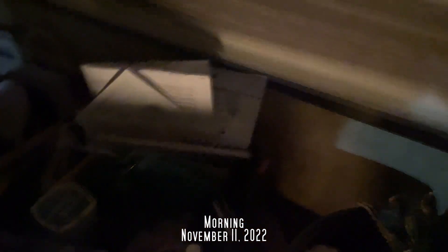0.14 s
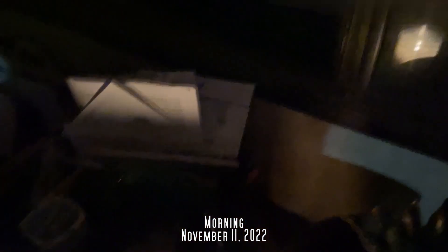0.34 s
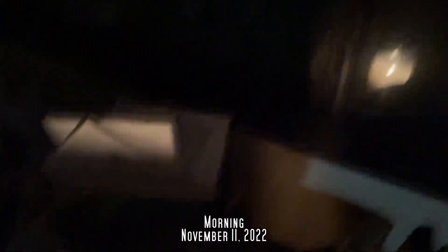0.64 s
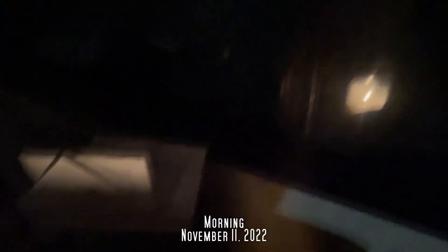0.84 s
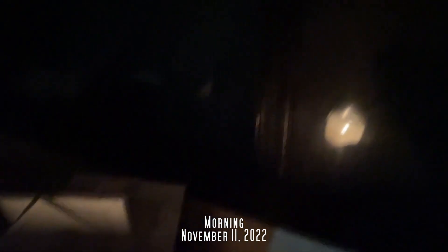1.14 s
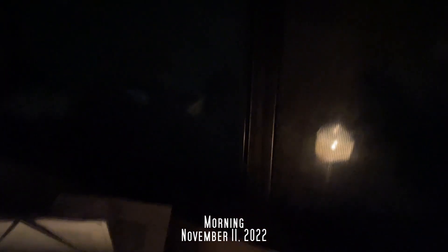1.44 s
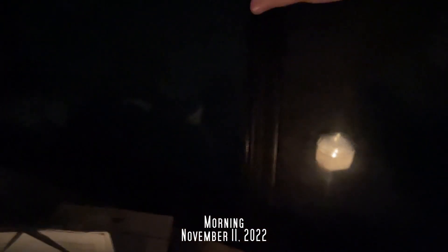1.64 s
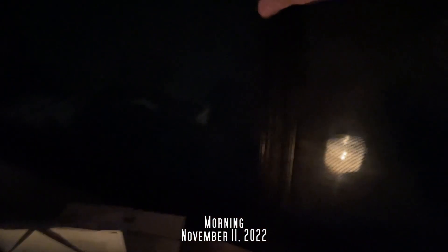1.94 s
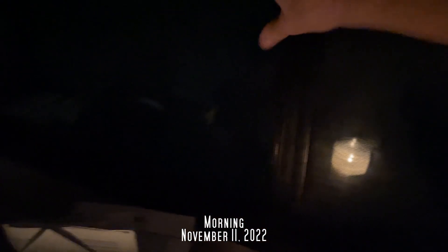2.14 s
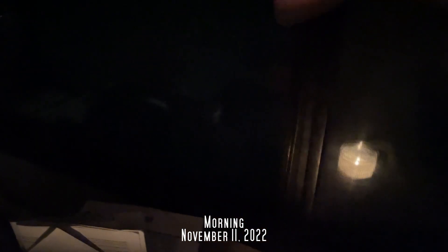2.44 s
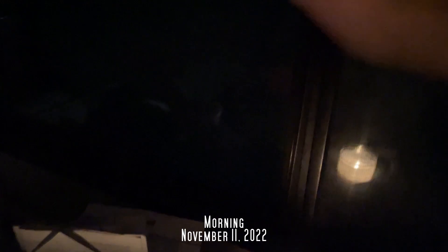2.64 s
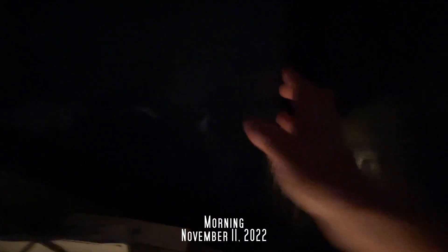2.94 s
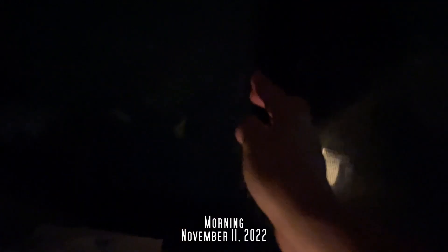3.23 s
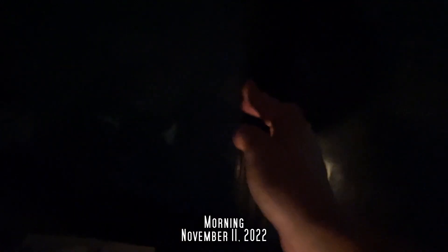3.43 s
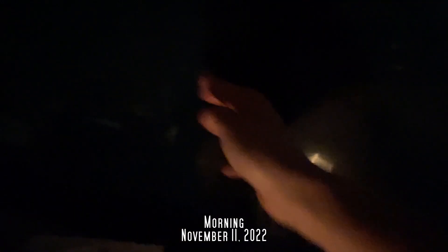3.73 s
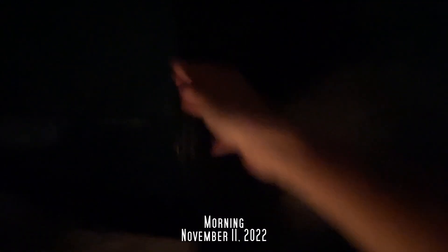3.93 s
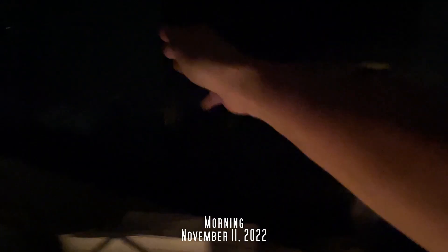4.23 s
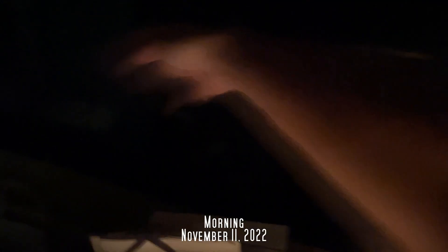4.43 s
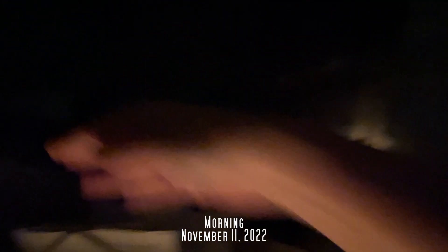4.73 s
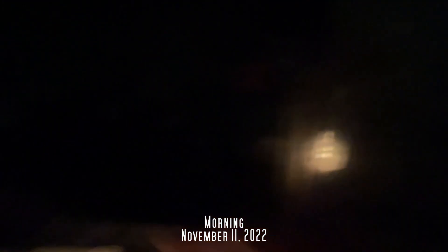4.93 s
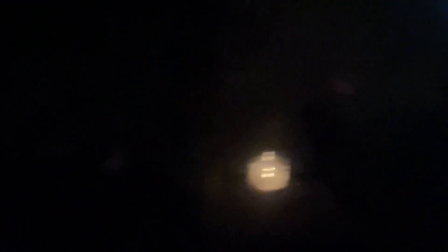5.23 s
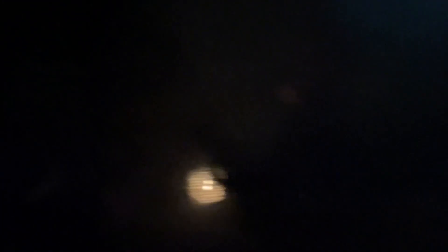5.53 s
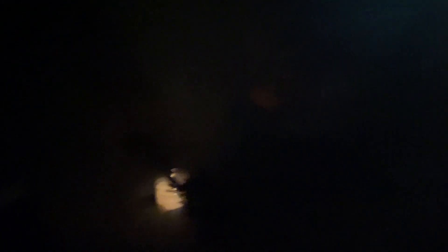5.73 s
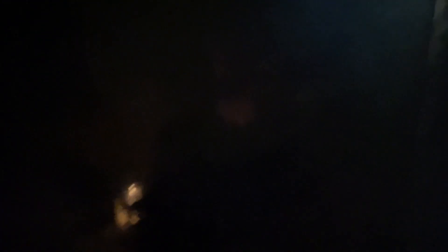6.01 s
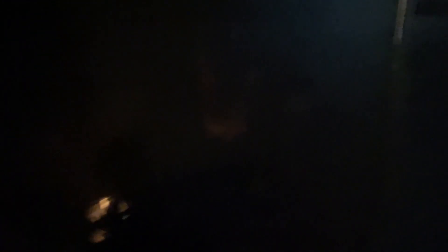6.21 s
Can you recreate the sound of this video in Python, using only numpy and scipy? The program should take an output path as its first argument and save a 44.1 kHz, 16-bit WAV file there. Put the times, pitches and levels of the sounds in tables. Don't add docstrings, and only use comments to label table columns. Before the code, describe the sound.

Close inside a small, quiet camper, a pleated blind slides with a soft hiss and a cord whirr that rises and falls. Light finger taps follow, then two sharp metallic latch snaps with a short ring. A screen brushes aside and stops with a hard, booming knock and small rattles. Finally a door swings out with ticks and faint creaks, over low floor thumps and faint hiss.

```python
import sys
import numpy as np
from scipy import signal
from scipy.fft import rfft, irfft, next_fast_len
from scipy.io import wavfile
from scipy.ndimage import uniform_filter1d, map_coordinates

SR = 44100
rng = np.random.default_rng(int(sys.argv[2]) if len(sys.argv) > 2 else 0)


def volts_from_decibels(level):
    exponent = np.asarray(level, float) / 20
    return 10 ** exponent


def bounce(signal):
    frames = np.transpose(np.atleast_2d(signal))
    limited = np.clip(frames, -1, 1)
    pcm = np.round(limited * 32767).astype(np.int16)
    wavfile.write(sys.argv[1], SR, pcm)


N = 280917


def rms_one(x):
    return x / np.sqrt(np.mean(x ** 2) + 1e-20)


def in_time(rows, silent=-130):
    s, *columns = np.transpose(rows)
    return [np.interp(np.arange(N) / SR, s, column, left=silent, right=silent) for column in columns]


def at_hz(points, hz):
    table_hz, values = np.array(points).T
    return np.interp(np.log(hz + 1), np.log(table_hz), values)


def coloured(spectrum, size):
    fast = next_fast_len(size, real=True)
    hz = np.arange(fast // 2 + 1) * SR / fast
    white = rfft(rng.standard_normal(fast))
    return rms_one(irfft(white * volts_from_decibels(at_hz(spectrum, hz)), fast)[:size])


def drift(rate_hz):
    coarse = np.arange(0, N + 32, 32)
    steps = coarse / SR * min(rate_hz, 60)
    slow = map_coordinates(rng.standard_normal(400), [steps], order=3)
    return np.interp(np.arange(N), coarse, slow)


def resonance(x, hz, width_hz):
    r = np.exp(-np.pi * width_hz / SR)
    return signal.lfilter([1 - r, 0, r - 1], [1, -2 * r * np.cos(2 * np.pi * hz / SR), r * r], x)


def narrow_resonance(x, hz, width_hz):
    return resonance(resonance(x, hz, width_hz), hz, 2 * width_hz)


def stereo(mid, side):
    return np.array([mid + side, mid - side])


def panned(pan_db):
    return volts_from_decibels(pan_db * np.array([[.5], [-.5]]))


def add(out, s, piece):
    i = int(s * SR)
    out[..., i:i + piece.shape[-1]] += piece[..., :N - i]


def swells(starts, held, levels_db, rise_db_per_s, fall_db_per_s):
    t = np.arange(0, N + 64, 64)[:, None] / SR
    before_db = rise_db_per_s * np.maximum(starts - t, 0)
    after_db = fall_db_per_s * np.maximum(t - starts - held, 0)
    power = (volts_from_decibels(levels_db - np.minimum(before_db + after_db, 200)) ** 2).sum(1)
    return np.interp(np.arange(N) / SR, t[:, 0], 10 * np.log10(power))


# frequency in Hz, density in dB per Hz.
RAIL_SPECTRUM = [(110, -25), (180, -7), (361, -5), (410, 2.5), (539, -4), (624, -6.5), (684, -2),
                 (1600, -12.5), (2080, -36), (3520, -120)]


def slide(hiss_db, rail_db, hiss, hiss_side, side_db, grain_db):
    flutter = volts_from_decibels(grain_db * drift(45))
    bright = stereo(coloured(hiss, N), volts_from_decibels(side_db) * coloured(hiss_side, N))
    dull = stereo(coloured(RAIL_SPECTRUM, N), volts_from_decibels(-4.0) * coloured(RAIL_SPECTRUM, N))
    return flutter * volts_from_decibels(hiss_db) * bright + volts_from_decibels(rail_db + 2 * drift(30)) * dull


def stroke(rows, rail_db, follows):
    hiss_db, = in_time(rows)
    rumble_db = rail_db + follows * (hiss_db + 50)
    return hiss_db, np.minimum(rumble_db, hiss_db + 14)


# time in seconds, hiss level in dB.
BLIND_PULL = [(0.0, -68), (0.06, -66), (0.114, -60), (0.18, -53), (0.4, -48.5), (0.494, -52.5),
              (0.6, -49.5), (0.745, -56.5), (0.8, -74), (.95, -96)]
# frequency in Hz, density in dB per Hz.
FABRIC_SPECTRUM = [(590, -30), (1000, -4), (2590, -6.5), (5290, -8.5), (7350, -14), (9000, -16),
                   (11200, -21), (15400, -29), (16000, -50)]
FABRIC_SIDE_SPECTRUM = [ (590, -39.5), (1000, -16), (2140, -8), (2600, -13), (8320, -22), (15000, -30)]


def blind():
    effort = stroke(BLIND_PULL, rail_db=-47.5, follows=0.69)
    return slide(*effort, FABRIC_SPECTRUM, FABRIC_SIDE_SPECTRUM, side_db=-0.5, grain_db=1.6)


# frequency in Hz, width in Hz, level in dB.
GUIDE_MODES = [(414, 60, 4), (880, 120, 0), (1290, 120, 2), (1720, 120, 2), (2167, 90, 2)]


def cord(rows, waver, slack):
    rate_hz, level_db = in_time(rows)
    turns = np.cumsum(np.maximum(rate_hz, 0) * (1 + waver * drift(40))) / SR
    slip = signal.lfilter([.008], [1, -.992], 16 * rng.standard_normal((2, N)))
    breath = signal.lfilter([.05], [1, -.95], 6 * rng.standard_normal(N))
    tone = np.sin(2 * np.pi * turns) * (0.9 + slack * slip[0])
    second = volts_from_decibels(-6.5) * np.sin(2 * np.pi * .87 * turns) * (0.78 + slack * slip[1])
    octave = volts_from_decibels(-8) * np.sin(4 * np.pi * turns) * breath
    ribs = np.sqrt(2) * volts_from_decibels(level_db) * (tone + second + octave)
    whirr = volts_from_decibels(-5) * ribs
    for hz, width_hz, db in GUIDE_MODES:
        whirr = whirr + volts_from_decibels(db) * resonance(ribs, hz, width_hz) / 2
    return stereo(whirr, volts_from_decibels(-4) * np.roll(whirr, 5))


# time in seconds, rib rate in Hz, level in dB.
BLIND_CORD = [(.125, 329.4, -62), (.154, 400, -53), (.18, 480, -53), (.224, 900, -52), (.27, 1260, -45.5),
              (.298, 1340, -50), (.335, 1700, -47), (.374, 1800, -51), (.44, 1960, -49), (.478, 2152, -48),
              (.505, 2175, -42), (.545, 2160, -49.5), (.58, 2113, -51), (.615, 1847, -52.5),
              (.672, 1521, -50.5), (.714, 1130, -50), (.744, 850, -48.5), (.78, 500, -69)]


def blind_cord():
    return cord(BLIND_CORD, waver=.011, slack=.65)


# frequency in Hz, density in dB per Hz.
CRACK_SPECTRUM = [(150, -4), (600, 2.5), (2500, -1.5), (5000, -4.5), (7000, -12.5), (10000, -14.5),
                  (13000, -25), (16000, -27)]
BAND_PAN_SHARES = [1.0, -.2, .4]


def contacts(rows, rise_s, uneven_db, crack_db, middle_share, middle_over_db):
    out, size = np.zeros((2, N)), 6000
    t = np.arange(size) / SR
    bands = [("highpass", 2500, 1), ("bandpass", [200, 800], 1.6), ("bandpass", [800, 2500], 1.25)]
    filters = [signal.butter(2, edges, kind, fs=SR, output="sos") for kind, edges, _ in bands]
    for s, dull_db, hard_db, pan_db, t60 in rows:
        bright_db = dull_db + hard_db
        middle_db = dull_db + middle_share * hard_db + middle_over_db
        grit = stereo(coloured(CRACK_SPECTRUM, size), volts_from_decibels(-9.5) * coloured(CRACK_SPECTRUM, size))
        grit = grit * volts_from_decibels(uneven_db * np.repeat(rng.standard_normal(size // 24), 24))
        levels = [bright_db, dull_db, middle_db]
        piece = 0
        for level_db, (_, _, slower), sos, share in zip(levels, bands, filters, BAND_PAN_SHARES):
            rattle = volts_from_decibels(-60 * t / (max(t60, .005) * slower))
            crack = volts_from_decibels(crack_db) * np.exp(-t / (.0015 * slower))
            rise = 1 - np.exp(-t / (rise_s * slower))
            part = signal.sosfilt(sos, grit * rise * (rattle + crack))
            loudest = np.sqrt(uniform_filter1d(part ** 2, 180).max())
            piece = piece + volts_from_decibels(level_db) * panned(share * pan_db) * part / loudest
        add(out, s - .0005, piece)
    return out


# start in seconds, strength in dB,
# hardness (treble over body) in dB, left-right difference in dB, rattle t60 in seconds.
SNAP_EVENTS = [(.152, -42, -18, 3.5, 0.089), (.213, -37, -19, -6, 0.035), (.596, -47, -13, -2, 0.016),
               (.629, -50, -10, 7, 0.014), (2.454, -44.5, 4, 3, 0.042), (2.46, -37, 15, 3.5, 0.07),
               (2.778, -53, -3.5, -4, 0.064), (2.7886, -45, 7.5, 1, 0.013), (2.7934, -35, 5, 0.5, 0.017),
               (2.812, -48, -8, -4, 0.069), (3.278, -56, -8, 2, .04), (3.291, -41.5, -9.5, 4, 0.078),
               (3.866, -46, -6, 0, .02), (3.891, -40, -6, 4, 0.034), (4.264, -32, -29, 4, 0.045),
               (4.282, -22.5, 0.5, 6, 0.049), (4.31, -29.5, -27, -1.5, 0.036),
               (4.399, -49.5, 13.5, 9.5, 0.033), (4.448, -41, -20, 1, .03), (4.467, -39, -5, -0.5, 0.062),
               (4.8814, -86, 22, 2, .01), (4.8195, -60.5, -1, -2, .015)]


def snaps():
    return contacts(SNAP_EVENTS, rise_s=0.0006, uneven_db=4.5, crack_db=3.5,
                    middle_share=0.54, middle_over_db=-0.1)


# start in seconds, strength in dB, hardness in dB, left-right difference in dB, rattle t60 in
# seconds.
BOUNCE_EVENTS = [(2.4645, -41, 14, 3, .03), (2.469, -40, 10, 3, .04), (2.476, -40, 4, 3, .04),
                 (2.485, -40, -3, 1, .04), (2.824, -62, 12, 2, .03), (2.836, -60, 12, 2, .025),
                 (3.205, -68, 0, 2, .06), (4.749, -54, -22, 0, .04)]


def bounces():
    return contacts(BOUNCE_EVENTS, rise_s=0.0006, uneven_db=4.5, crack_db=1.0,
                    middle_share=0.6, middle_over_db=0.5)


def struck(rows, soft_s, split):
    out, t = np.zeros(N), np.arange(SR // 3) / SR
    for s, level_db, hz, t60 in rows:
        close_hz = hz * (1 + split * rng.uniform(.5, 1, (3, 1)) * [[0], [1], [-1]])
        tones = (np.sin(2 * np.pi * close_hz * t) * [[.7], [.25], [.25]]).sum(0)
        add(out, s, volts_from_decibels(level_db - 60 * t / t60) * (1 - np.exp(-t / soft_s)) * tones)
    return out


# start in seconds, level in dB, frequency in Hz, t60 in seconds.
METAL_MODES = [(2.466, -40, 344, .14), (2.468, -45, 1023, .12), (2.474, -37, 590, .12),
               (2.474, -39, 720, .1), (2.462, -31, 1693, .075), (2.462, -44, 3951, 0.11),
               (2.462, -47, 5259, .12), (2.462, -44.5, 2686, .11), (2.7942, -25, 3171, 0.012),
               (2.7945, -31, 4890, 0.012), (4.4685, -32, 1440, 0.032), (4.4685, -35, 2140, 0.035),
               (4.5457, -49, 760, 0.042), (4.2825, -22, 3940, 0.011), (4.287, -29, 947, 0.039)]


def metal():
    return struck(METAL_MODES, soft_s=.0004, split=.02) * panned(3)


# start in seconds, level in dB, frequency in Hz, t60 in seconds.
SPRING_MODES = [(2.468, -34.5, 641, .26)]


def latch_spring():
    return struck(SPRING_MODES, soft_s=.006, split=.007)


# start in seconds, level in dB, frequency in Hz, t60 in seconds.
FRAME_MODES = [(2.463, -32.5, 480, 0.16), (2.794, -40.5, 239, 0.18), (3.29, -41, 610, 0.2),
               (3.288, -42, 479, 0.22), (3.349, -43, 590, 0.1), (2.271, -55, 290, .1),
               (1.74, -49.5, 232, .15), (5.488, -42, 420, .05), (6.218, -39, 510, 0.053),
               (6.269, -41, 479, 0.049), (1.655, -56.5, 420, 0.13), (5.567, -47, 412, 0.11)]


def frame():
    return struck(FRAME_MODES, soft_s=.0015, split=0.03)


# start in seconds, level in dB,
# frequency in Hz, t60 in seconds.
TIP_MODES = [(2.7934, -13, 3100, .004), (2.7936, -24, 7500, .006), (5.487, -43, 1000, .04),
             (3.2915, -43, 1760, .09), (3.2915, -45, 1100, .1), (3.282, -49, 587, .2),
             (3.3485, -46, 1050, .03), (4.469, -34, 1378, .056), (4.469, -35, 1550, .045),
             (4.5455, -42, 1110, .04), (4.653, -53, 1110, .05), (4.654, -59, 2150, .04),
             (4.672, -56, 2150, .04), (4.672, -52, 1150, .05), (.2125, -40, 900, .03),
             (.2125, -41, 650, .04), (3.192, -62, 3300, .02), (4.562, -38, 135, .22), (.163, -39, 420, .09),
             (2.4605, -27, 11800, .03), (3.3485, -49, 1900, .05), (6.2675, -44, 520, .04)]


def tips():
    return struck(TIP_MODES, soft_s=.0002, split=.03)


# start in seconds, frequency in Hz, level in dB,
# t60 in seconds, width in Hz.
RING_EVENTS = [(2.466, 1000, -48, 0.14, 170), (2.462, 1710, -32, 0.087, 170),
               (2.462, 2400, -29.5, 0.1, 590), (2.794, 1900, -38, .06, 1200), (2.815, 2000, -55, .06, 1200),
               (3.259, 2150, -72, .2, 120), (1.19, 1300, -68, .06, 800), (1.19, 400, -56, .07, 150),
               (2.8, 3400, -40, .05, 700), (2.82, 3750, -38.5, 0.05, 600), (2.831, 3450, -38, 0.045, 800),
               (2.85, 3200, -57, 0.11, 1000), (2.944, 3330, -69, 0.19, 500), (3.168, 2900, -77, 0.2, 500),
               (3.35, 1075, -45.5, 0.08, 310), (3.29, 1020, -44, .07, 550), (3.29, 1720, -49.5, 0.083, 450),
               (3.35, 2000, -50.5, .06, 860), (.899, 1170, -56, 0.065, 270), (.82, 1800, -53, 0.045, 300),
               (4.655, 1150, -58, .05, 400), (4.672, 930, -55.5, .06, 600), (6.031, 1070, -53.5, .05, 440),
               (5.565, 910, -47, .06, 280), (4.285, 520, -30, .12, 250), (4.468, 1450, -35, 0.045, 400),
               (4.545, 1100, -46, 0.048, 330), (.82, 2400, -52, 0.052, 600), (.152, 414, -34.5, 0.15, 54),
               (4.283, 4010, -30, 0.035, 390), (4.285, 900, -31, 0.06, 220), (1.727, 1180, -58, 0.11, 600),
               (1.808, 3200, -68, .05, 800), (.17, 900, -46, .2, 302)]


def rings():
    out, t = np.zeros((2, N)), np.arange(SR // 4) / SR
    settle = 2000
    for s, hz, level_db, t60, width_hz in RING_EVENTS:
        shaking = rng.standard_normal((2, len(t) + settle))
        mid, side = narrow_resonance(shaking, hz, width_hz)[:, settle:]
        start = np.sqrt(np.mean(mid[:int(t60 * SR / 4)] ** 2))
        shape = volts_from_decibels(level_db - 2.0 - 60 * t / t60) * (1 - np.exp(-t / 0.00078))
        add(out, s, shape * stereo(mid, volts_from_decibels(-9.5) * side) * panned(1.5) / start)
    return out


# time in seconds, hiss level in dB.
SCREEN_PUSH = [(3.36, -80), (3.4, -68), (3.45, -63), (3.5, -55.5), (3.696, -44), (3.898, -43), (4.232, -47),
               (4.408, -43.5), (4.48, -49), (4.58, -74), (4.62, -101)]
# frequency in Hz, density in dB per Hz.
BRUSH_SPECTRUM = [(590, -31.5), (1000, -2.5), (2160, -2), (3400, -4.5), (5860, -4.5), (8230, -5),
                  (11400, -17), (15400, -19), (16000, -40)]
BRUSH_SIDE_SPECTRUM = [ (590, -33.5), (1000, 0.5), (6130, -4.5), (8420, -4.5), (15000, -15)]


def screen():
    effort = stroke(SCREEN_PUSH, rail_db=-55.5, follows=0.42)
    return slide(*effort, BRUSH_SPECTRUM, BRUSH_SIDE_SPECTRUM, side_db=-3.5, grain_db=1.9)


# time in seconds, rib rate in Hz, level in dB.
SCREEN_CORD_RATE = [(3.79, 1049, -62), (3.83, 850.8, -50), (3.87, 618.5, -47), (3.895, 382.6, -46),
                    (3.915, 249.6, -60)]


def screen_cord():
    return cord(SCREEN_CORD_RATE, waver=0.018, slack=.6)


# start in seconds, strength in dB, hardness in dB,
# left-right difference in dB.
SETTLING_EVENTS = [(4.5434, -57.5, -2, -0.5), (4.6315, -63, -24, 2), (4.6537, -59, -24, 5),
                   (4.6706, -56, -17, 1), (4.741, -56.5, -18, 2), (4.7557, -56, -13, 1),
                   (4.8586, -68, -7, 1), (4.8198, -61.5, -7, -2), (5.024, -58, -21, 2),
                   (5.041, -70, 0.5, -1)]


def settling():
    rows = [(*row, 0.04) for row in SETTLING_EVENTS]
    return contacts(rows, rise_s=0.0023, uneven_db=5.5, crack_db=-3, middle_share=0.44, middle_over_db=2.5)


# start in seconds, strength in dB, hardness in dB, left-right difference in dB.
TICK_EVENTS = [(5.3725, -53.5, -2, 5), (5.4206, -60, 1, 1), (5.4858, -37.5, -3, 3.5), (5.5637, -44, -14, 0),
               (5.5772, -45, -28, 0.5), (5.6214, -52, -5.5, 1.5), (5.915, -62, -9, -0.5),
               (6.0301, -49.5, -22, 1), (6.0853, -57, -15, 5), (6.2173, -36, -4, 1), (6.2668, -45, -20, -1),
               (6.3644, -48.5, -13, 3)]


def ticks():
    rows = [(*row, .034) for row in TICK_EVENTS]
    return contacts(rows, rise_s=0.0012, uneven_db=5.5, crack_db=0, middle_share=0.7, middle_over_db=1.1)


# start in seconds, strength in dB, hardness in dB,
# left-right difference in dB.
TAP_EVENTS = [(0.7946, -67, 2, 4.5), (0.8182, -49, -3, 1.5), (0.8994, -51.5, 0.5, 2),
              (1.0792, -65.5, -13, 3), (1.1893, -64, -26, -2), (1.6517, -61, -19, 0),
              (1.7257, -51.5, -33, -2), (1.8073, -69.5, -0.5, 1), (1.818, -71, 1, 1), (1.829, -74, 0, 4),
              (2.0442, -71.5, -6, 3), (2.2702, -57, -5, 0.5), (2.2513, -68, -4, 1), (2.2912, -62, -4, 1),
              (2.3207, -60, -3, 4), (2.392, -66, 2, 2), (.894, -61, 1, 3), (.829, -58.5, 3, 3),
              (2.7232, -86, 18, 1), (2.9422, -70.5, 5, 4), (3.1921, -72, 8, 4), (3.3485, -45, -16, -1)]


def taps():
    rows = [(*row, .058) for row in TAP_EVENTS]
    return contacts(rows, rise_s=0.0012, uneven_db=5.5, crack_db=0, middle_share=.6, middle_over_db=1.5)


RUB_RISE_DB_PER_S, RUB_FALL_DB_PER_S = 301, 250
# start in seconds, time held in seconds, frequency in Hz,
# width in Hz, level in dB.
DRONE_EVENTS = [(.24, .1, 925, 115, -56), (.41, .05, 900, 120, -54), (.3, 0.15, 3320, 600, -58.5),
                (3.5, 0.044, 2200, 150, -65), (3.62, .26, 2140, 200, -55.5), (3.68, .08, 1580, 150, -55),
                (3.95, .1, 2400, 250, -56), (4.06, .08, 1150, 120, -54.5), (4.18, .08, 400, 120, -53.5),
                (5.74, 0.074, 360, 60, -69.5), (5.89, .06, 378, 60, -65.5), (5.83, .06, 950, 80, -83),
                (6.05, 0.11, 418, 60, -66), (4.98, 0.039, 315, 80, -67.5)]


def drones():
    out, t = np.zeros((2, N)), np.arange(SR // 2) / SR
    lead_s = .1
    for s, held, hz, width_hz, level_db in DRONE_EVENTS:
        mid, side = rms_one(narrow_resonance(rng.standard_normal((2, len(t))), hz, width_hz))
        before_db = RUB_RISE_DB_PER_S * np.maximum(lead_s - t, 0)
        after_db = RUB_FALL_DB_PER_S * np.maximum(t - lead_s - held, 0)
        add(out, s - lead_s, volts_from_decibels(level_db - before_db - after_db) * stereo(mid, volts_from_decibels(-6) * side))
    return out


def rubbing(rows, surface, grain_db):
    s, held, hiss_db, rumble_db = np.transpose(rows)
    levels = [swells(s, held, db, RUB_RISE_DB_PER_S, RUB_FALL_DB_PER_S) for db in (hiss_db, rumble_db)]
    return slide(*levels, surface, surface, side_db=-0.5, grain_db=grain_db)


# start in seconds, time held in seconds, hiss in dB, rumble in dB.
GRIP_EVENTS = [(2.295, 0.02, -75, -78), (2.33, 0.054, -76, -79.5), (2.43, .02, -62, -72.5),
               (6.18, 0.022, -72, -80), (3.2, .03, -76, -76)]
# frequency in Hz, density in dB per Hz.
LEVER_SPECTRUM = [(410, -38), (700, -8), (1140, -6), (1330, -1), (2730, -8), (4320, -5), (8110, -27),
                  (10700, -19), (15000, -50)]


def grips():
    return rubbing(GRIP_EVENTS, LEVER_SPECTRUM, grain_db=4.0)


# start in seconds, time held in seconds,
# hiss in dB, rumble in dB.
RUB_EVENTS = [(4.68, 0.0086, -90, -67.5), (4.75, .02, -84, -67), (4.86, 0.047, -87.5, -73.5),
              (4.98, .38, -89.5, -88), (5.44, 0.12, -76, -78), (5.67, 0.507, -74.5, -75),
              (6.2, 0.14, -70.5, -66.5)]
# frequency in Hz, density in dB per Hz.
SEAL_SPECTRUM = [(600, -30), (1000, -1.5), (2000, -5.5), (2600, -0.5), (4750, -11), (5150, 1.5),
                 (5500, 1.5), (5950, -7.5), (7900, -9), (10000, -15.5), (15000, -40)]


def rubs():
    return rubbing(RUB_EVENTS, SEAL_SPECTRUM, grain_db=2.0)


# time in seconds, level in dB.
RESTLESS_BOOM = [(0, -54), (.75, -54), (.93, -69), (1.05, -88), (1.35, -70), (1.55, -76), (1.7, -64.5),
                 (2.4, -60.5), (2.65, -88), (3.1, -79), (3.22, -56.5), (3.5, -51.5), (4.55, -48.5),
                 (4.66, -64.5), (5.0, -58), (5.17, -68), (5.45, -55), (6.37, -58)]
# time in seconds, floor boom in dB, wall panel boom in dB.
WEIGHT_SHIFTS = [(0.0, -35, -39.5), (.16, -45, -38.5), (.25, -45, -63), (.34, -51, -42),
                 (.53, -44.5, -42.5), (.62, -42.5, -42.5), (.82, -46.5, -57), (1.22, -57.5, -58),
                 (1.74, -54, -42), (1.829, -43, -55), (1.92, -46, -67), (2.04, -47, -65), (2.15, -44, -64),
                 (2.32, -52, -59), (2.47, -58, -43.5), (2.52, -48.5, -45.5), (2.82, -42, -43),
                 (3.37, -51, -50), (3.49, -55, -41.5), (3.56, -46, -49), (3.67, -42, -39.5),
                 (3.95, -44, -44), (4.06, -37, -47.5), (4.295, -30, -37), (4.565, -47.5, -45),
                 (5.07, -56.5, -60), (5.52, -44, -43.5), (6.08, -45, -52), (6.23, -50, -42),
                 (6.3, -45, -44.5)]


def sway():
    steady_db, = in_time(RESTLESS_BOOM)
    s, floor_db, panel_db = np.transpose(WEIGHT_SHIFTS)
    levels = []
    for shift_db, under_db in ((floor_db, 0), (panel_db, 3)):
        swell_db = swells(s, 0, shift_db, rise_db_per_s=280, fall_db_per_s=220)
        levels.append(10 * np.log10(volts_from_decibels(steady_db - under_db) ** 2 + volts_from_decibels(swell_db) ** 2))
    return levels


# frequency in Hz, width in Hz.
FLOOR_RESONANCES = [(56, 17), (69, 14), (82, 19)]
PANEL_RESONANCES = [(118, 37), (145, 35), (180, 36.4)]
# start in seconds, peak level in dB, frequency in Hz, t60 in seconds.
BODY_KNOCKS = [(1.727, -34, 90, 0.12), (1.909, -44, 83, 0.15), (2.125, -44, 67, 0.18),
               (2.313, -43.5, 78.1, 0.2), (2.782, -41, 140, 0.2), (3.666, -30.5, 65.5, 0.23),
               (3.672, -35, 150, .14), (3.893, -39.5, 153, 0.13), (4.041, -34, 75.5, 0.15),
               (4.263, -25.5, 240, 0.08), (4.279, -16, 69.4, 0.13), (4.309, -25, 121, 0.11),
               (6.099, -39.5, 152, 0.14)]


def shaken(modes):
    return rms_one(sum(narrow_resonance(rng.standard_normal(N), hz, width_hz) for hz, width_hz in modes))


def body():
    floor_db, panel_db = sway()
    floor, panel, panel_side = shaken(FLOOR_RESONANCES), shaken(PANEL_RESONANCES), shaken(PANEL_RESONANCES)
    knocks = struck(BODY_KNOCKS, soft_s=0.0029, split=0.092)
    panel_gain = volts_from_decibels(panel_db - 4.5)
    mid = volts_from_decibels(floor_db - 1.5) * floor + panel_gain * panel + knocks
    side = volts_from_decibels(-12.5) * panel_gain * panel_side + volts_from_decibels(floor_db - 21) * panel - .06 * knocks
    return panned(-1.2) * stereo(mid, side)


# frequency in Hz, t60 in seconds.
CABIN_T60 = [(150, 0.36), (600, 0.16), (2500, 0.15), (6000, .17), (14000, 0.071)]


def cabin(x):
    t, edges = np.arange(SR // 3) / SR, 100 * 2. ** np.arange(8)
    tail = 0
    for low, high in zip(edges, np.minimum(2 * edges, 19000)):
        sos = signal.butter(2, [low, high], "band", fs=SR, output="sos")
        band = signal.sosfilt(sos, rng.standard_normal((2, len(t))))
        tail = tail + band * volts_from_decibels(-60 * t / at_hz(CABIN_T60, np.sqrt(low * high)))
    tail = tail * (1 - np.exp(-t / 0.0026))
    tail = tail / np.sqrt((tail ** 2).sum(1, keepdims=True))
    return signal.fftconvolve(x, tail, axes=1)[:, :N]


# frequency in Hz, density in dB per Hz.
HUSH_SPECTRUM = [(15, -33), (25, -2.5), (65, 0), (126, -2.5), (257, -18), (666, -24), (1290, -31.5),
                 (5400, -39), (8240, -43.5), (14000, -54)]


def hush():
    hum = volts_from_decibels(-67 + 3.4 * drift(5)) * np.sin(2 * np.pi * 122.1 * np.arange(N) / SR)
    return stereo(volts_from_decibels(-70) * coloured(HUSH_SPECTRUM, N) + hum, volts_from_decibels(-73.5) * coloured(HUSH_SPECTRUM, N))


def scene():
    hits = snaps() + bounces() + rings() + tips() + settling() + ticks() + taps()
    tones = blind_cord() + screen_cord() + metal() + latch_spring() + frame()
    steady = blind() + screen() + drones() + grips() + rubs() + body() + hush()
    return hits + tones + volts_from_decibels(-8) * cabin(hits) + steady


def top_cut(x):
    return signal.sosfilt(signal.butter(12, 16660, fs=SR, output="sos"), x)


# frequency in Hz, left lead in radians.
PORT_LEAD = [(5700, 0), (7670, -2.8), (8200, -3.14), (8600, -3.7), (11000, -6.05), (12300, -6.6),
             (14300, -9.4), (16500, -10.6)]


def record(dry):
    size = next_fast_len(N, real=True)
    hz = np.arange(size // 2 + 1) * SR / size
    mid, side = rfft(np.array([dry[0] + dry[1], dry[0] - dry[1]]) / 2, size, axis=1)
    share = np.clip((hz - 5500) / (7200 - 5500), 0, 1)
    half = at_hz(PORT_LEAD, hz) / 2
    stray = 1 - share * (1 - volts_from_decibels(-14))
    side = stray * side + 1j * np.sin(half) * mid
    mid, side = irfft(np.array([np.cos(half) * mid, side]), size, axis=1)[:, :N]
    passband = signal.butter(2, [40, 16500], "band", fs=SR, output="sos")
    ports = signal.sosfilt(passband, stereo(mid, side))
    return top_cut(ports)


dry = scene()
out = record(dry)
bounce(out)
```